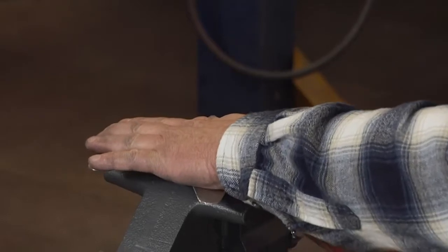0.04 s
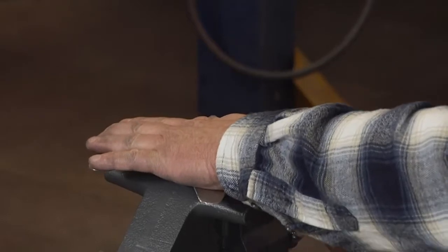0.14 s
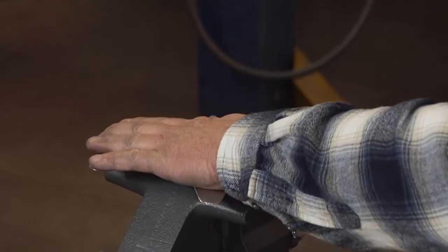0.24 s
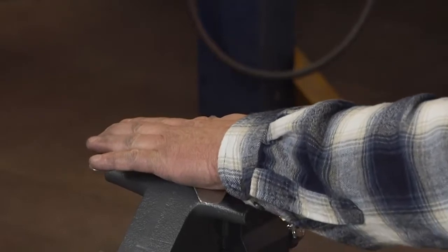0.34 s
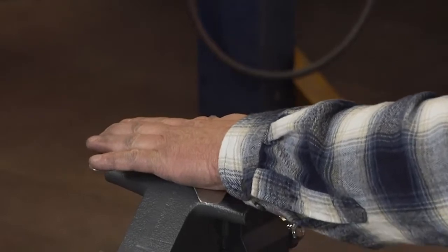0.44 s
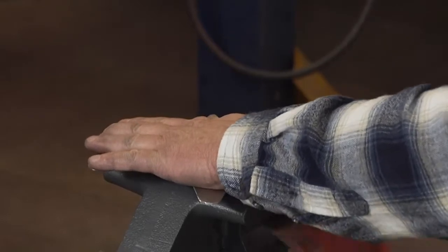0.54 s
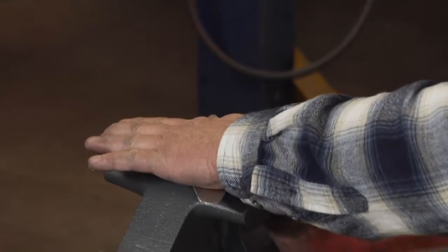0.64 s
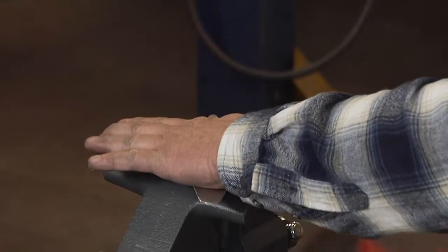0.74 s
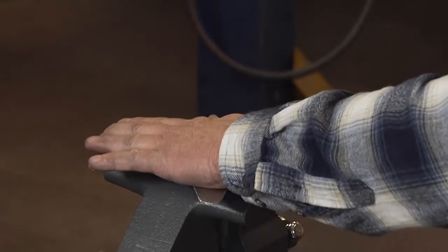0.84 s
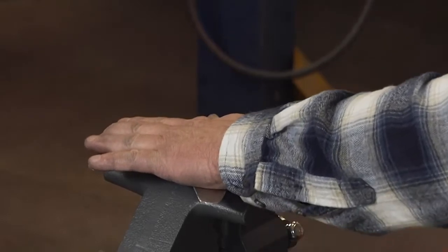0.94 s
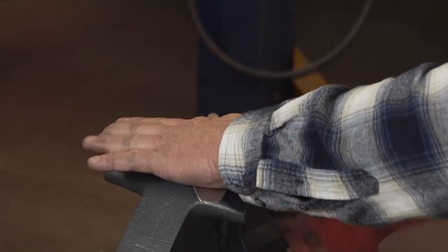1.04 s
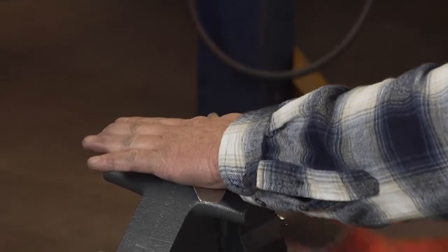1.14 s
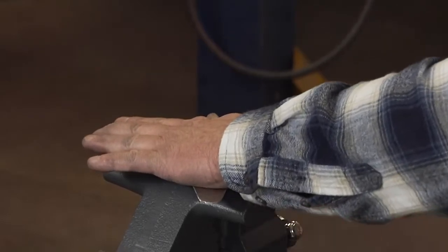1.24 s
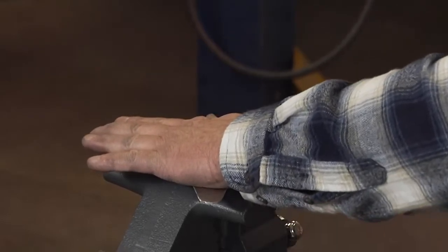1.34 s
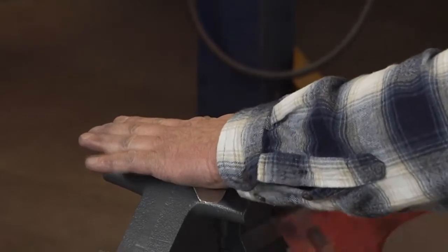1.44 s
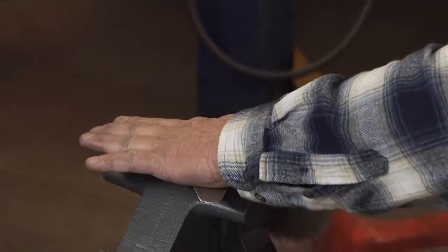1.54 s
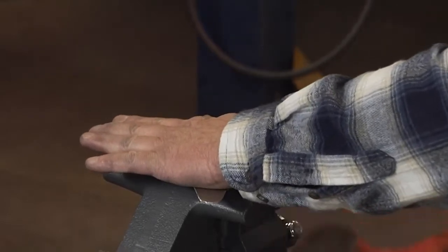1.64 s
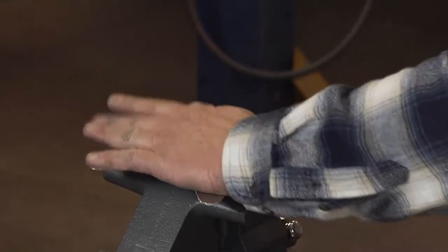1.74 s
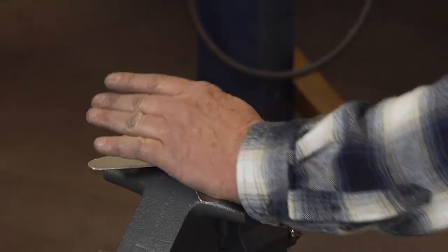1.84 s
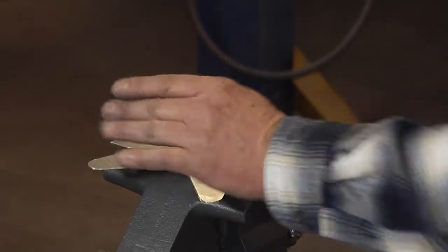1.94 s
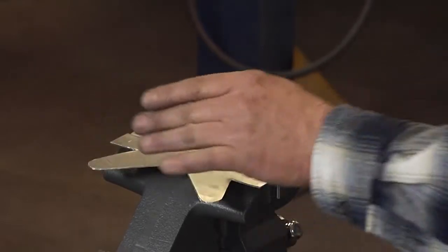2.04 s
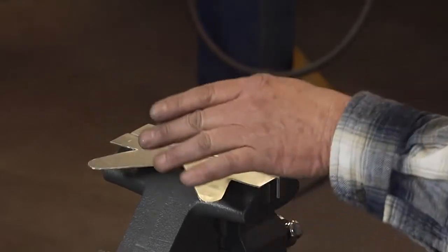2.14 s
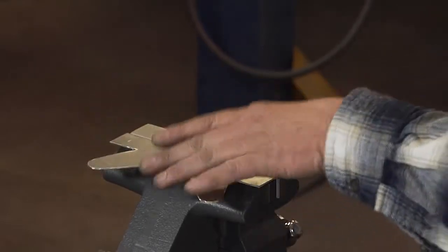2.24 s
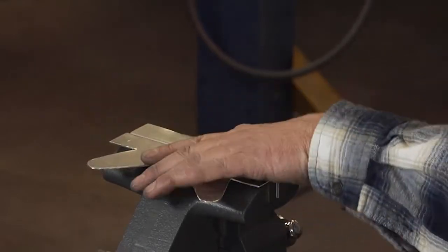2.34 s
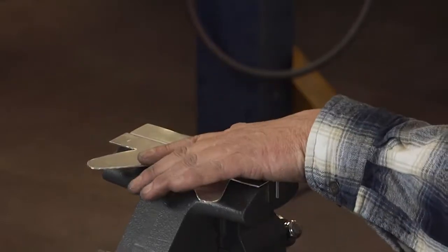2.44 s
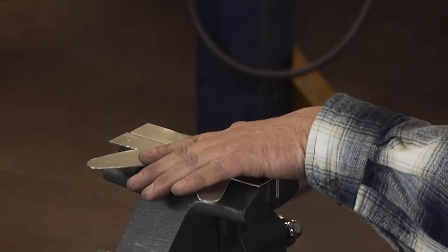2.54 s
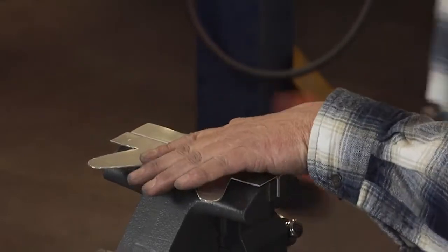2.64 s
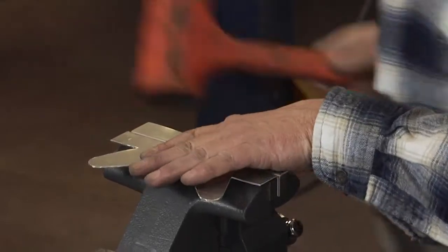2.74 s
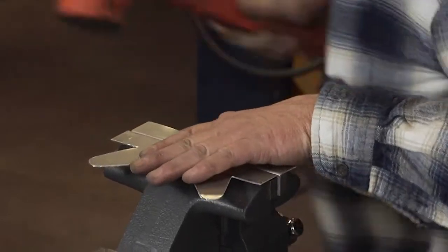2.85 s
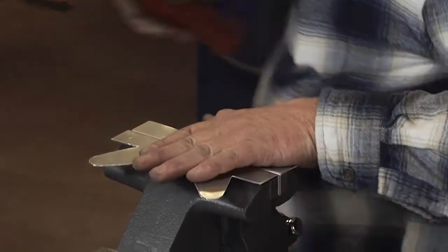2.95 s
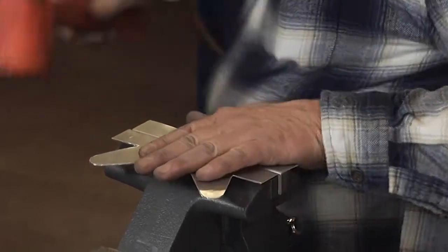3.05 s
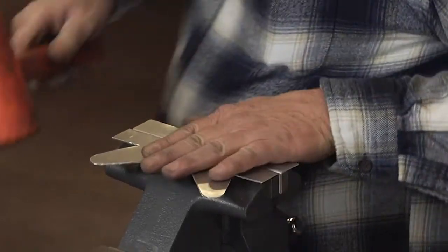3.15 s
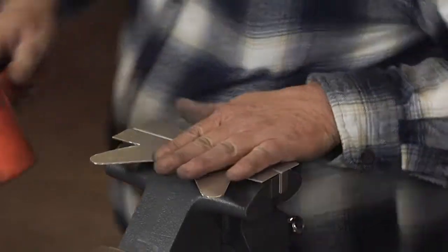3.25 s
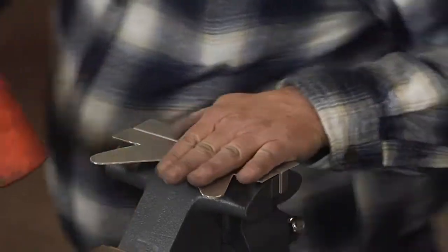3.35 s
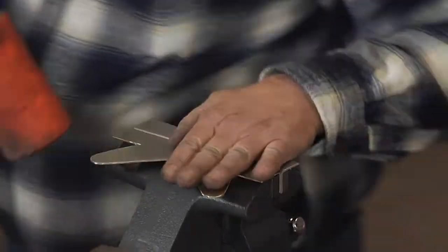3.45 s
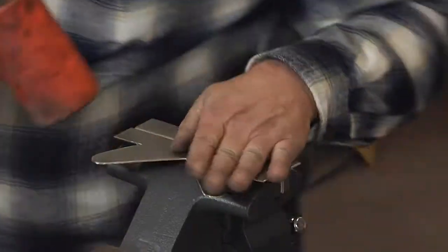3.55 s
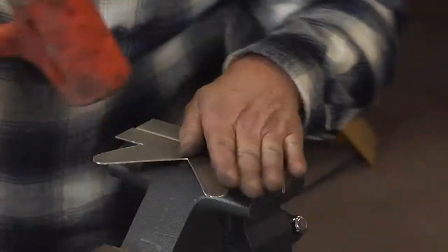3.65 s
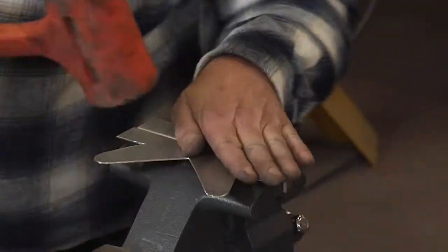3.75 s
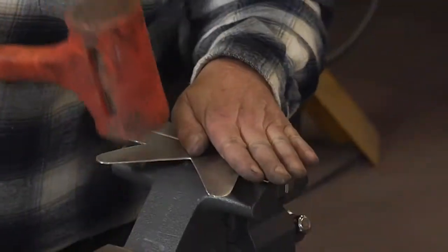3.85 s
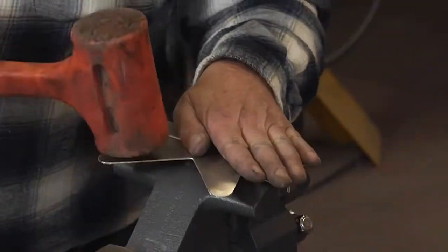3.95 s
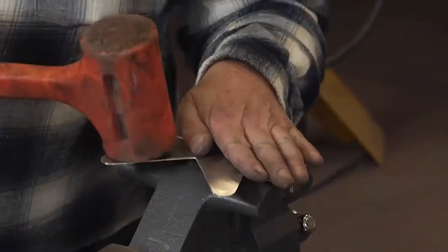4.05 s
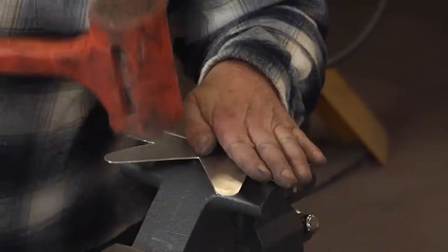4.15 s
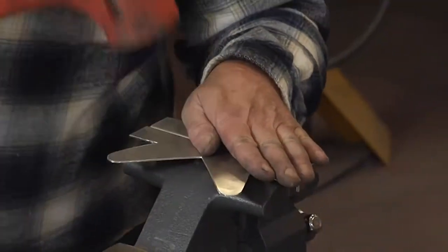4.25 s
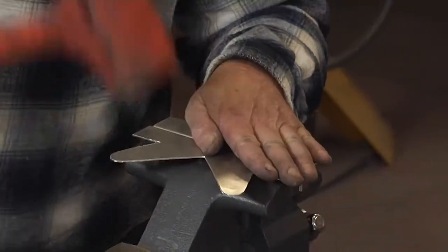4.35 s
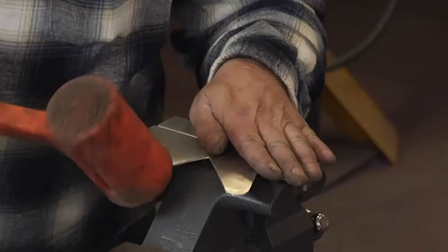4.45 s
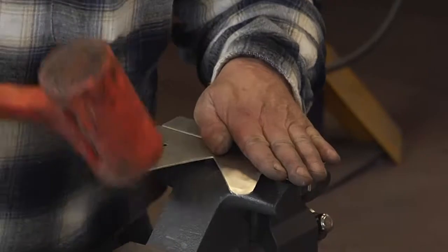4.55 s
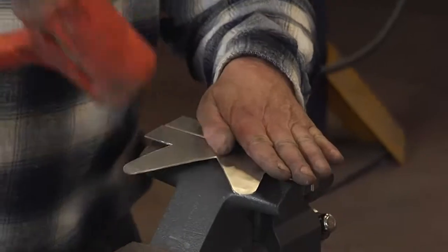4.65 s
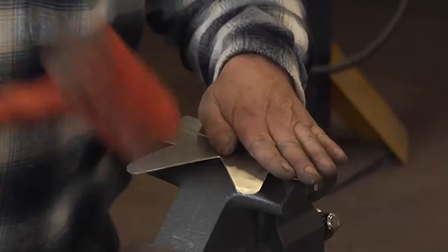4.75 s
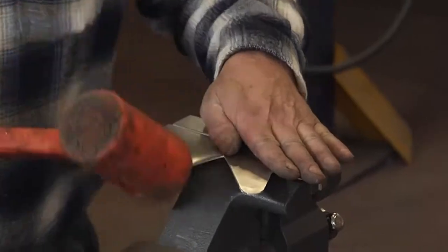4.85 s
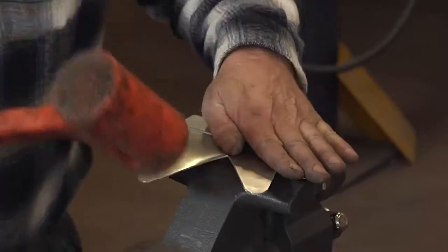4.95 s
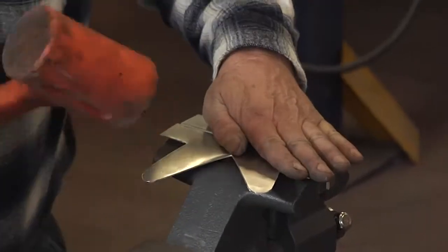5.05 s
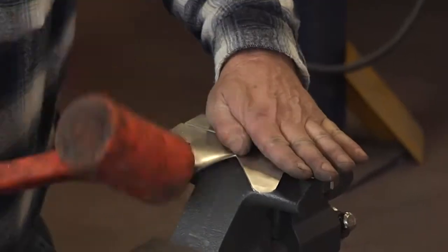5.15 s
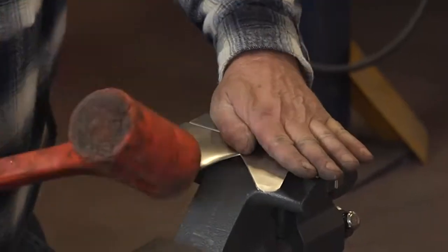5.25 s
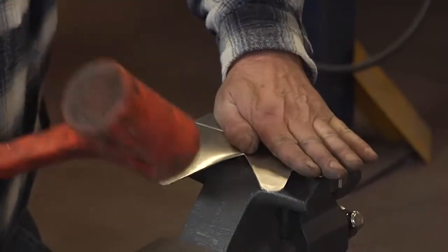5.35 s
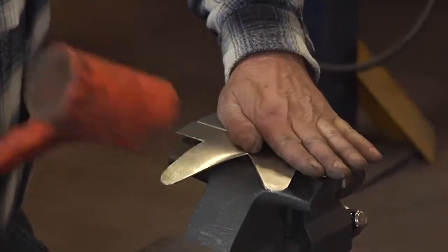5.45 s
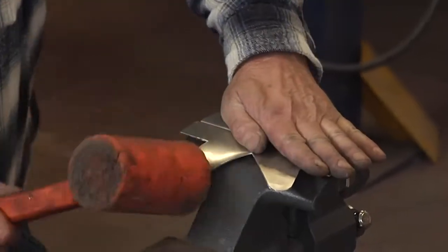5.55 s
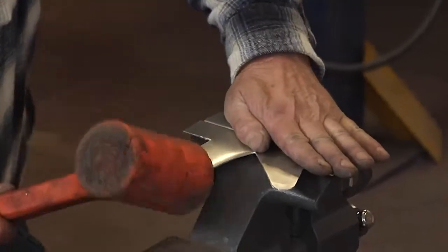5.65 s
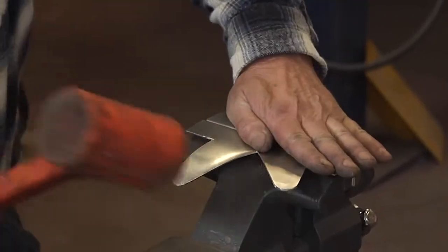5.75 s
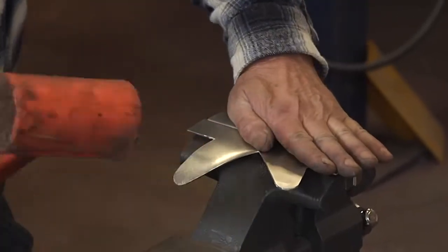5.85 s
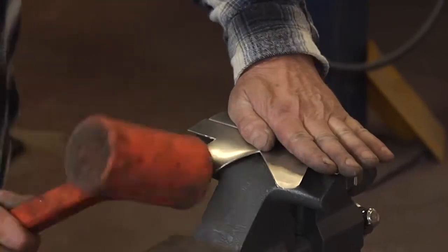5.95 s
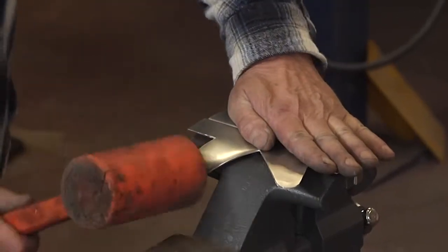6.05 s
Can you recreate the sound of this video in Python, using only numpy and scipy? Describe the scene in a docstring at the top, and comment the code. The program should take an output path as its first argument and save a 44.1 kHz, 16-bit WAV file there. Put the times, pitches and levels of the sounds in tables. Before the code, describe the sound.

A mallet strikes thin aluminium sheet on a steel vise, four sharp blows, a pause, then five more, in a workshop.

```python
"""A workshop, close to a steel vise, one microphone: a shot-filled dead-blow mallet folds thin aluminium sheet.
Four blows land behind the jaws; the mallet is turned, taps lightly, and five more bend a free flap down.
Each blow knocks the flap, slaps it on the jaw, rings the sheet and shakes the stand and bench.
Loose shot hisses in the mallet head, hands bump and rub the work, and the walls answer over still air."""
import sys
import numpy as np
from scipy import signal
from scipy.fft import rfft, irfft
from scipy.io import wavfile

SR = 44100
rng = np.random.default_rng(int(sys.argv[2]) if len(sys.argv) > 2 else 0)


def to_wav(sig):
    """Store sig (one row per channel, or 1-D mono) as 16-bit WAV at the path in sys.argv[1].

    Samples outside -1..1 are clipped; the rate is SR.
    """
    pcm = np.clip(np.atleast_2d(sig), -1, 1) * 32767
    pcm = np.round(pcm).astype(np.int16)
    wavfile.write(sys.argv[1], SR, pcm.T)  # frames by channels


N = 268569
AGE = np.arange(2 * SR) / SR  # seconds since a blow
TURN_S = 2.7  # the work moves to the flap; pairs picked by side() read (behind the vise, on the flap)

# mallet meets sheet: start_s, force_db, knock_db, flap_hz, favoured_ring_hz, slap_delay_s, jaw_weight_db
BLOWS = [ (0.0159, -2, -19, 1300, 1300, 0.0032, -6), (0.5542, -1, -45, 1250, 3280, 0.02, 1.5),
         (1.0289, 1.5, -19.5, 1095, 5600, 0.0011, -3), (1.462, 2.5, -4, 566, 2450, .001, -2),
         (3.9292, -36.5, -55, 1000, 3880, 0.00036, -52), (3.9373, -19.5, -13, 947, 3800, 0.00079, -26),
         (4.0227, -41.5, -25.5, 875, 3240, 0.00073, -57), (4.0852, -43, -32, 1150, 1300, 0.00098, -45),
         (4.429, -1, -2, 937, 5500, .001, -16.5), (4.8117, -3, -5.5, 864, 3300, .0087, -12),
         (5.168, 0, -8.5, 930, 9000, 0.0056, -5), (5.542, 0, -3.5, 865, 3260, 0.0043, -2.5),
         (5.9728, 1.5, -14, 830, 7300, .0034, -6)]


def mallet():
    """The face knocks the flap and damps it; the hollow head rings briefly."""
    # modes of the damped flap: pitch_ratio, level_db, t60_s
    flap_modes = [(1, 1, 0.016), (.84, -4, 0.012), (1.31, -5.5, 0.02), (1.75, -15.5, 0.015)]
    # modes of the head as it lands on the flap: pitch_hz, level_db, t60_s
    head_modes = [(3187, 3.5, 0.014), (2500, -21, 0.015), (4800, -12, 0.00368), (5680, -12.5, 0.0098),
                  (9000, -25, .012)]
    out = np.zeros(N)
    for s, force_db, knock_db, flap_hz, *_ in BLOWS:
        onset = s + .0006  # the face sinks in before the flap answers
        lean_db = np.interp(s, (4.4, 5.6), (0, -12.5))  # leaning with the fold, the head rings less
        head_db = force_db + (-21.5, -0.5)[side(s)] + lean_db
        head_pitch = (.89, 1)[side(s)]  # lower when it lands square behind the vise
        flap = ring([(flap_hz * ratio, db, t60) for ratio, db, t60 in flap_modes], rise_s=0.0012)
        head = ring([(hz * head_pitch, db, t60) for hz, db, t60 in head_modes], rise_s=0.00093)
        add(out, onset, undb(knock_db) * flap)
        add(out, onset, undb(head_db) * head)
    return out


def contacts():
    """Each blow touches the sheet, then slaps it on the jaw: start_s, crack_db, length_s, weight_db."""
    touch_db, touch_s, touch_weight_db = (-16, -23), (0.003, 0.0019), (-10, -22)
    slap_db, slap_s = (-25.5, -16), (0.0021, 0.0034)
    rows = []
    for s, force_db, *_, slap_delay, weight_db in BLOWS:
        k = side(s)
        rows.append((s, force_db + touch_db[k], touch_s[k], force_db + touch_weight_db[k]))
        rows.append((s + slap_delay, force_db + slap_db[k], slap_s[k], weight_db))
    return rows


def slaps():
    """The sheet chatters on the steel as the vise thuds under the weight: (direct, sent to the walls)."""
    # modes of the struck vise: pitch_hz, level_db, t60_s
    vise_modes = [(85, -17, 0.055), (205, -6.5, 0.016), (337.6, -4, 0.018), (510, -2, 0.012),
                  (699, -15.5, 0.025), (1273, -9.5, 0.0033)]
    cracks, spread, thuds = np.zeros((3, N))
    tremble = undb(-16.5) * fade(0.22)  # the sheet goes on trembling against the jaw
    for s, crack_db, length, weight_db in contacts():
        contact = np.minimum(AGE / .0007, 1) / (1 + (AGE / length) ** 8)
        add(cracks, s, undb(crack_db) * (contact + tremble) * rng.standard_normal(len(AGE)))
        # the walls get the contact as one even click of the same energy
        add(spread, s, undb(crack_db) * np.array([np.linalg.norm(contact)]))
        add(thuds, s + length / 2, undb(-3.5 + 1.23 * weight_db) * ring(vise_modes, rise_s=0.0017))
    return shade(cracks) + thuds, shade(spread) + thuds


def shade(x):
    """The chatter reaches the microphone duller from behind the vise than from the open flap."""
    # spectrum of the chatter: frequency_hz, behind_db, flap_db
    chatter_colour = [(102, 1.5, -20), (497, -2, 10.5), (1400, 5.5, 6.5), (1950, 0, 2.5), (2600, 0.5, 5),
                      (3630, -2.5, -1), (5700, -2, 1.5), (8430, -3.5, -1), (11000, -5.5, -2.5),
                      (12800, -17, -6.5), (15900, -20, -12)]
    hz, behind_db, flap_db = np.transpose(chatter_colour)
    behind = np.arange(N) < TURN_S * SR
    return colour(x * behind, list(zip(hz, behind_db))) + colour(x * ~behind, list(zip(hz, flap_db)))


def bench():
    """The stand booms after each blow; the bench clatters at each contact, higher for glancing ones."""
    # boom of the stand: band_hz, level_db, t60_s
    boom_bands = [(25, -21.5, 1.1), (61, -23.5, 1.4), (123, -5, 0.69), (180, -10.5, 1.2), (305, -20, 1.92),
                  (597, -27, 1.23)]
    # clatter of the bench before the weight shifts its pitch: band_hz, level_db, t60_s
    clatter_bands = [(122, -15, 0.33), (280, -12.5, 1.48), (420, -5, 0.42), (647, -15.5, 1.044),
                     (930, -19.5, 1.06), (1910, -25.5, 0.41), (4000, -56.5, .6)]
    # lasting resonances of stand and bench: pitch_hz, level_db, t60_s
    stand_modes = [(116, -38, 1.3), (208, -43, 1.2), (254, -41, 1.3), (276, -37, 1.7), (398, -36, 1.0),
                   (490, -39, .9)]
    out = np.zeros(N)
    for s, force_db, *_ in BLOWS:
        lag_s = (0, .03)[side(s)]  # from the flap side the boom comes by way of the walls
        boom_db = force_db + (-4, -6)[side(s)]
        add(out, s + lag_s, undb(boom_db) * dense_decay(boom_bands, rise_s=0.014))
    db_per_octave, max_pitch = 14, (0.99, 2.4)
    for s, _, _, weight_db in contacts():
        pitch = min(1.054 * 2 ** (-weight_db / db_per_octave), max_pitch[side(s)])
        clatter = dense_decay([(hz * pitch, db, t60) for hz, db, t60 in clatter_bands], rise_s=0.0013)
        stand = ring(stand_modes, rise_s=0.0049, scatter_db=2.5)
        add(out, s, undb(weight_db) * (clatter + stand))
    return out


def sheet():
    """Thin ringing of the aluminium; the spot that is struck favours the modes around one pitch."""
    # free modes of the sheet: pitch_hz, t60_s, struck_behind_db, struck_on_flap_db
    sheet_modes = [ (565, .6, -54, -35), (797, .7, -50, -45), (1285, .6, -47, -51), (2370, .5, -54, -48),
                   (3140, .8, -57, -50), (3270, .7, -56, -49), (3880, .7, -52, -48), (5220, .8, -50, -60),
                   (5500, .6, -49, -53), (5720, .6, -56, -49), (6135, .75, -48, -53), (7100, .5, -53, -58),
                   (7380, .5, -53, -60), (9250, .5, -54, -53), (9960, .5, -48, -52), (10650, .5, -56, -62),
                   (11600, .5, -59, -55)]
    hz, t60, behind_db, flap_db = np.transpose(sheet_modes)
    out = np.zeros(N)
    for s, force_db, _, _, favoured_hz, *_ in BLOWS:
        favour_db = 8 * np.exp(-(np.log2(hz / favoured_hz) / .25) ** 2)
        mode_db = (behind_db, flap_db)[side(s)] + favour_db
        ring_db = .85 * force_db + (-3, -4)[side(s)]  # a light tap damps the sheet less
        add(out, s, undb(ring_db) * shimmer(zip(hz, mode_db, t60)))
    return out


def flap_squeak():
    """The bent flap rubs on the jaw as the mallet lifts and sings briefly in its high modes."""
    # rub on the jaw: peak_s, level_db, half_length_s
    jaw_rubs = [(6.019, -30.5, 0.0073)]
    # high modes of the flap: pitch_hz, level_db, t60_s
    squeak_modes = [(3317, -0.5, 0.043), (6150, -5, 0.035), (10200, 1.5, .03)]
    return resonate(swells(jaw_rubs) * rng.standard_normal(N), squeak_modes)


def shot():
    """Hundreds of pellets scrape the wall of the mallet head, then patter on its face."""
    # shot rushes as the mallet turns or starts down: peak_s, level_db, fall_half_length_s
    rushes = [ (2.951, -71, 0.096), (3.145, -61.5, 0.083), (3.53, -63, 0.15), (4.054, -53, 0.014),
              (4.381, -46, 0.017), (4.777, -44, 0.014), (5.13, -43.5, 0.013), (5.513, -42.5, .013),
              (5.916, -46, .021)]
    # spectrum of sliding shot: frequency_hz, level_db
    hiss_colour = [(200, 3), (1000, 4.5), (2500, -5.5), (3600, -2), (5300, -1.5), (6700, -3), (8800, 1),
                   (11000, 1), (13000, -9), (15500, -1)]
    # modes of the scraped wall: pitch_hz, level_db, t60_s
    wall_modes = [(4050, -7, 0.004), (4520, 3, .003)]
    # spectrum of landing shot: frequency_hz, level_db
    patter_colour = [(500, -14), (2500, -7), (4500, 2), (6500, -8), (9000, -1.5), (12000, -0.5),
                     (15500, -5.5)]
    # a few pellets run ahead of each rush, then the rest let go at once
    trickles = [(s - 2 * half, db - 12.5, 0.84 * half) for s, db, half in rushes]
    slide = swells(rushes, rise_share=0.46) + swells(trickles)
    # the shot lands just after the face; a light tap hardly moves it
    lag_s, landing_db, half_s = (0.018, 0.022), (-31.5, -29), (0.0029, 0.0032)
    landing = swells([(s + lag_s[side(s)], landing_db[side(s)] + 1.3 * force_db, half_s[side(s)])
                      for s, force_db, *_ in BLOWS])
    pressing = slide / (slide + undb(-61.5))  # only a fast flow presses hard on the wall
    hiss = undb(4.5) * colour(slide * grains(scatter_db=1.7), hiss_colour)
    scrape = undb(-1) * resonate(slide * pressing * grains(scatter_db=1.7), wall_modes)
    patter = colour(landing * grains(scatter_db=1.7), patter_colour)
    return hiss + scrape + patter


def pellet_ticks():
    """Lone pellets strike the wall of the head with tiny, bright clicks."""
    # pellet strikes: start_s, level_db
    strikes = [(2.927, -44), (3.099, -45), (3.152, -44), (3.191, -41), (4.033, -50)]
    # spectrum of a tick: frequency_hz, level_db
    tick_colour = [(1000, -20), (4000, -12), (6500, -9), (9500, 0), (13000, -3), (16000, -10)]
    out = np.zeros(N)
    for s, db in strikes:
        add(out, s, undb(db) * fade(t60=.0025) * rng.standard_normal(len(AGE)))
    return colour(out, tick_colour)


def handling():
    """Hand and body bump the work; skin catches on the sheet and rings it faintly."""
    # soft bumps: start_s, level_db, pitch_hz, t60_s
    bumps = [(0.511, -11.5, 205, 0.011), (2.547, -37, 674, 0.016), (2.996, -30, 150, 0.025),
             (2.997, -38.5, 341, 0.028), (3.264, -32, 256, 0.038), (3.286, -42.5, 309, 0.11),
             (4.024, -25, 324, 0.034)]
    # the hand slides to a new hold: peak_s, level_db, half_length_s
    rubs = [(2.338, -55, .015), (3.35, -63, 0.037), (3.52, -71, 0.055)]
    # modes of the rubbed sheet: pitch_hz, level_db, t60_s
    rub_modes = [(1350, 2, 0.014), (2260, -3, 0.013), (3120, 1, 0.0051), (4440, -1.5, 0.0045)]
    thumps = np.zeros(N)
    for s, db, hz, t60 in bumps:
        add(thumps, s, undb(db) * ring([(hz, 0, t60)], rise_s=0.0046))
    friction = swells(rubs) * grains(scatter_db=5)
    return thumps + resonate(friction, rub_modes) + undb(-7) * friction


def workshop(x):
    """Near walls answer first, the far end lingers; sound from behind the vise carries more room."""
    # reverberation of the near walls: band_hz, level_db, t60_s
    near_bands = [(100, -60, 1.06), (400, -39, 0.66), (912, -48.5, 0.71), (1630, -43.5, 1.68),
                  (3045, -38, 0.8), (5560, -39.5, 0.69), (9200, -41.5, 0.49), (15000, -50, 1.05)]
    # reverberation of the far end: band_hz, level_db, t60_s
    far_bands = [(110, -58.5, 7.1), (313, -53, 4.2), (695, -43, 2.26), (1490, -60, 4.95), (2510, -71, 1.6),
                 (5000, -71, 1.0)]
    send_db = np.where(np.arange(N) < TURN_S * SR, 0, -3.5)
    response = dense_decay(near_bands, rise_s=.008) + dense_decay(far_bands, rise_s=.06)
    return signal.fftconvolve(x * undb(send_db), response)[:N]


def still_air():
    """Room tone: a faint, steady, low rush."""
    # spectrum of the room tone: frequency_hz, level_db
    air_colour = [(15, -46.5), (25, -3.5), (92, -0.5), (195, 1), (363, 1.5), (560, -4), (936, -8),
                  (1130, -10.5), (1230, -15), (2000, -17), (9570, -26), (14800, -26.5), (16000, -33)]
    return undb(-61) * colour(rng.standard_normal(N), air_colour)


def side(s):
    """0 for a blow behind the vise, 1 for a blow on the free flap."""
    return int(s > TURN_S)


def undb(db):
    """Decibels to gain."""
    return 10 ** (np.asarray(db) / 20)


def add(out, s, x):
    """Mix x in from time s."""
    i = max(int(s * SR), 0)
    out[i:i + len(x)] += x[:max(N - i, 0)]


def fade(t60):
    """Exponential decay, 60 dB down after t60 seconds."""
    return np.exp(-np.log(1000) * AGE / t60)


def ring(modes, rise_s, scatter_db=0):
    """Damped sines (pitch_hz, level_db, t60_s) that swell while the push lasts."""
    offset_db = scatter_db * rng.standard_normal(len(modes))
    tones = sum((-1) ** k * undb(db + offset_db[k]) * fade(t60) * np.sin(2 * np.pi * hz * AGE)
                for k, (hz, db, t60) in enumerate(modes))
    return tones * (1 - np.exp(-AGE / rise_s))


def shimmer(modes):
    """Each mode (pitch_hz, level_db, t60_s) rings as a narrow cluster, different after every blow."""
    tones = 0
    for hz, db, t60 in modes:
        detune, strength = rng.standard_normal(2)
        width_hz = min(12 + .009 * hz, 55)
        steps = rng.standard_normal((SR // 20, 2)) @ [1, 1j] / np.sqrt(2)
        wander = np.interp(AGE * 2 * width_hz, np.arange(len(steps)), steps)
        carrier = np.exp(2j * np.pi * (hz + detune * width_hz / 2) * AGE)
        tones = tones + undb(db + 2 * strength) * fade(t60) * np.imag(wander * carrier)
    return tones * (1 - np.exp(-AGE / .003))


def dense_decay(bands, rise_s):
    """Countless overlapping modes: noise that builds up, then dies at its own rate in each band."""
    noise = rfft(rng.standard_normal(len(AGE)))
    log_hz = np.log(np.fft.rfftfreq(len(AGE), 1 / SR) + 1)
    centres = [hz for hz, _, _ in bands]
    knots = np.log([centres[0] / 2, *centres, centres[-1] * 2])
    tail = sum(undb(db) * fade(t60) * irfft(noise * np.interp(log_hz, knots[k:k + 3], [0, 1, 0]))
               for k, (_, db, t60) in enumerate(bands))
    return tail * (1 - np.exp(-AGE / rise_s))


def resonate(x, modes):
    """Drive modes (pitch_hz, level_db, t60_s) with x, keeping the power of white noise."""
    response = ring(modes, rise_s=0.0006)
    return signal.fftconvolve(x, response / np.linalg.norm(response))[:N]


def colour(x, points):
    """Minimum-phase filter through (frequency_hz, level_db) points, keeping the power of white noise."""
    size = 2048
    hz, db = np.transpose(points)
    log_hz = np.log(np.fft.rfftfreq(size, 1 / SR) + 1)
    gain = undb(np.interp(log_hz, np.log(hz), db))
    cepstrum = irfft(np.log(gain))
    cepstrum[1:size // 2] *= 2
    cepstrum[size // 2 + 1:] = 0
    response = irfft(np.exp(rfft(cepstrum)))
    return signal.fftconvolve(x, response / np.linalg.norm(response))[:len(x)]


def swells(rows, rise_share=1):
    """Envelope of bell shapes (peak_s, level_db, half_length_s); rise_share scales the leading side."""
    t = np.arange(N) / SR
    return sum(undb(db) * np.exp(-.5 * ((t - s) / np.where(t < s, rise_share * half, half)) ** 2)
               for s, db, half in rows)


def grains(scatter_db):
    """Dense ticks of very uneven size, rms 1."""
    ticks = rng.standard_normal(N) * undb(scatter_db * np.minimum(rng.exponential(size=N), 6))
    return ticks / ticks.std()


def scene():
    """At the microphone: blows, shot and handling in the room, over bench rumble and still air."""
    knocks = mallet()
    slap, slap_to_walls = slaps()
    small_sounds = sheet() + flap_squeak() + shot() + pellet_ticks() + handling()
    knocks_to_walls = undb(-9) * knocks  # the face throws its knock forward, so the walls get less
    room = workshop(knocks_to_walls + slap_to_walls + small_sounds)
    air = still_air()
    return (knocks + slap + small_sounds + room + bench() + air)[None]


def record(dry):
    """The recorder rounds the highest peaks and cuts the treble above 16 kHz."""
    lowpass = signal.ellip(10, .2, 80, 16000, fs=SR, output="sos")
    return signal.sosfilt(lowpass, np.tanh(dry))


dry = scene()
out = record(dry)
to_wav(out)
```